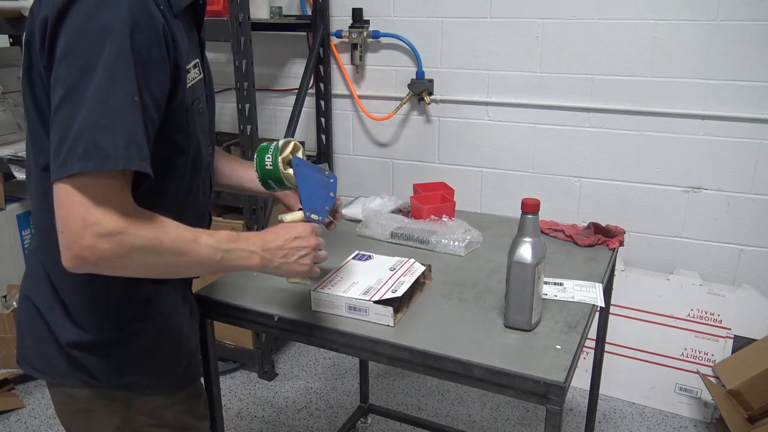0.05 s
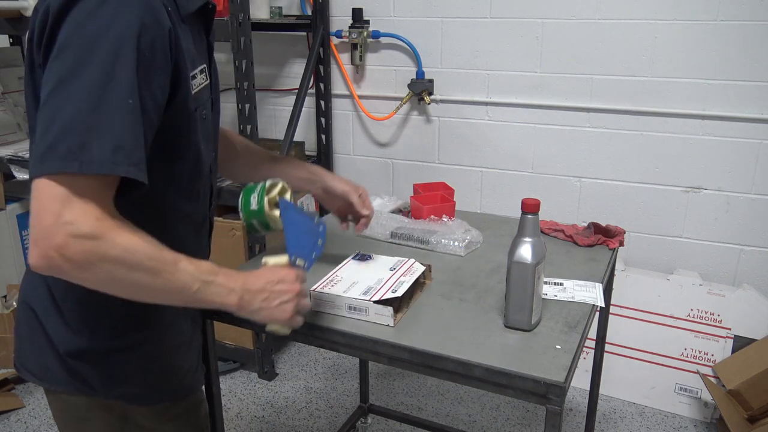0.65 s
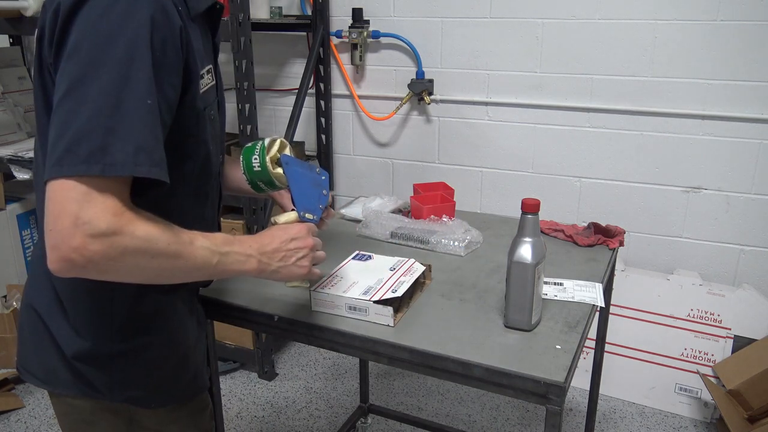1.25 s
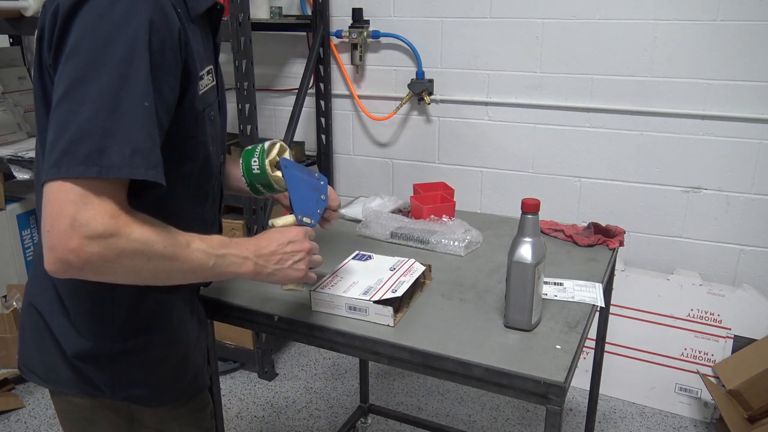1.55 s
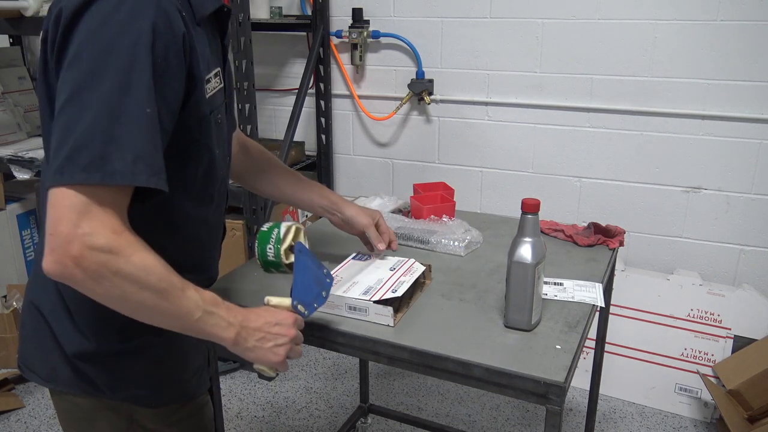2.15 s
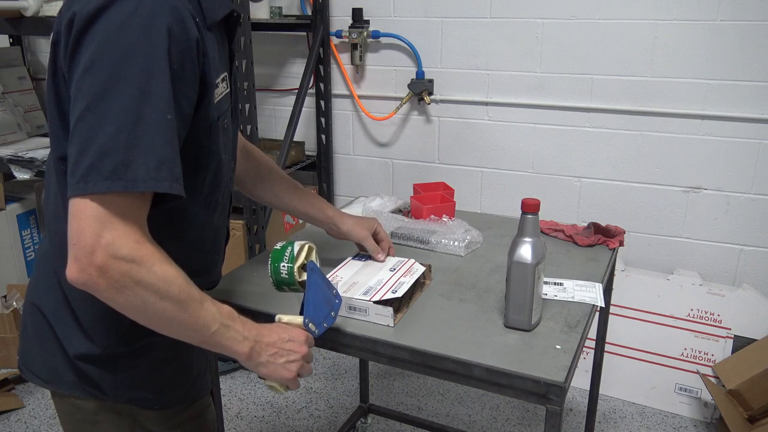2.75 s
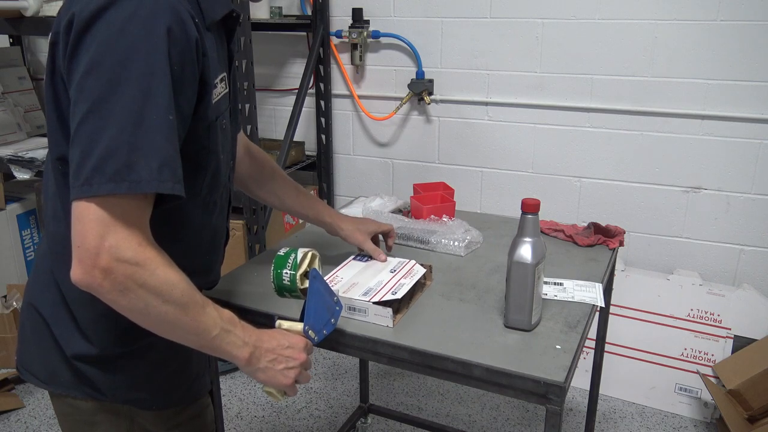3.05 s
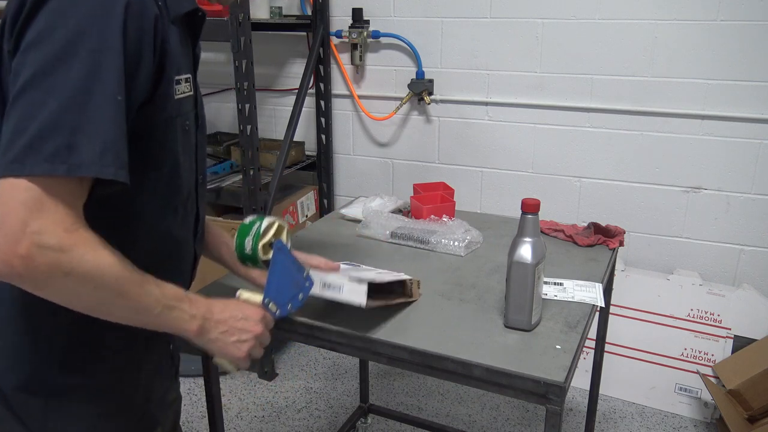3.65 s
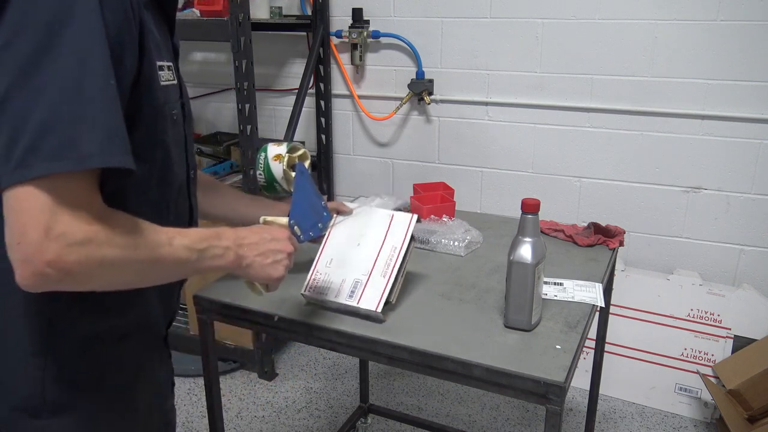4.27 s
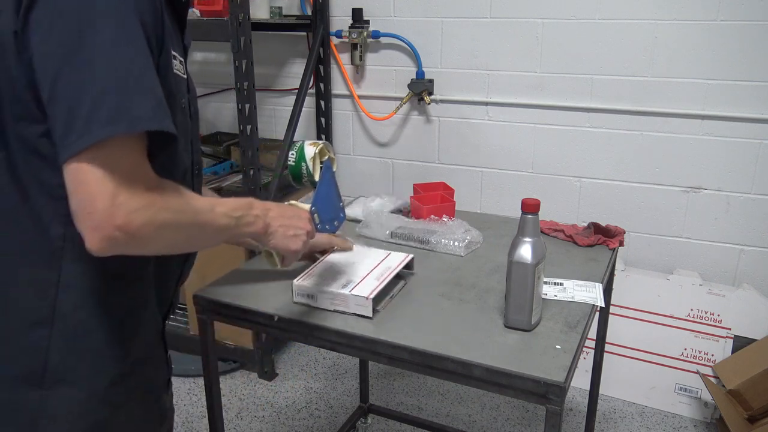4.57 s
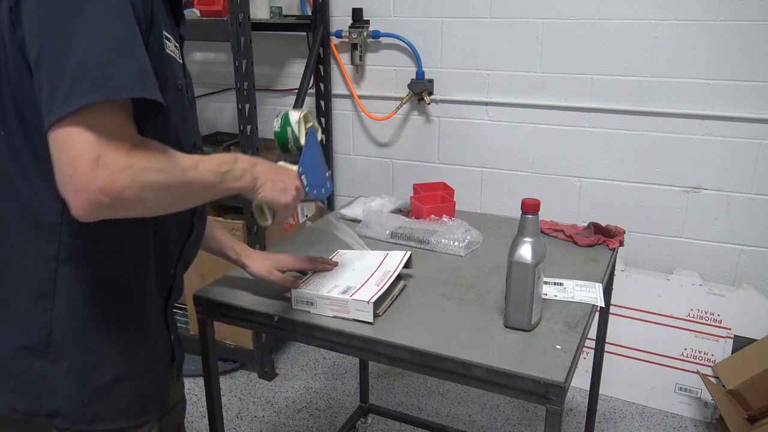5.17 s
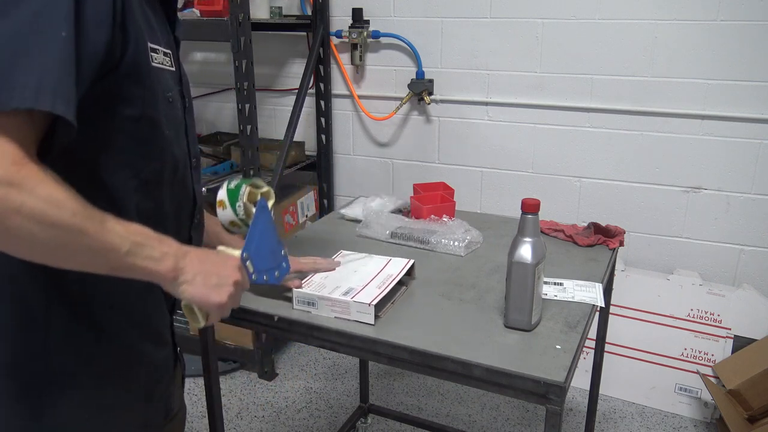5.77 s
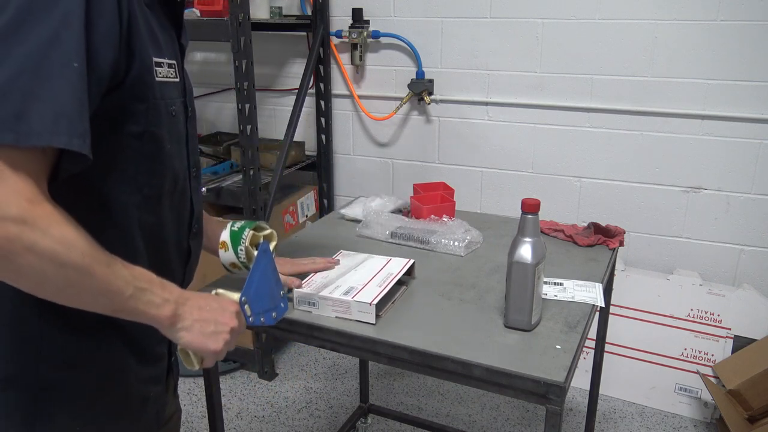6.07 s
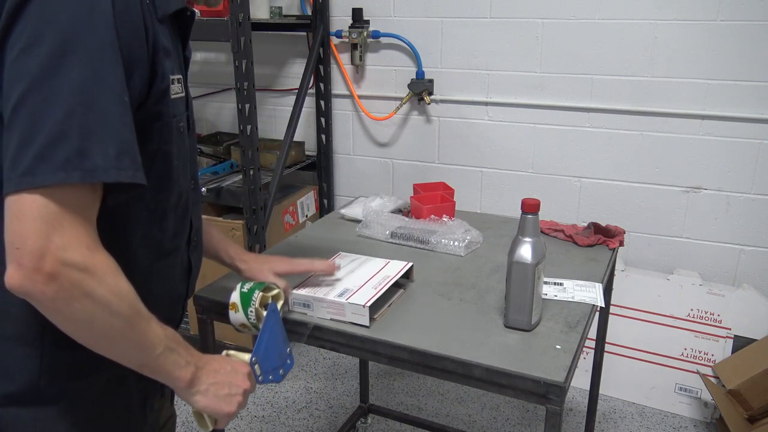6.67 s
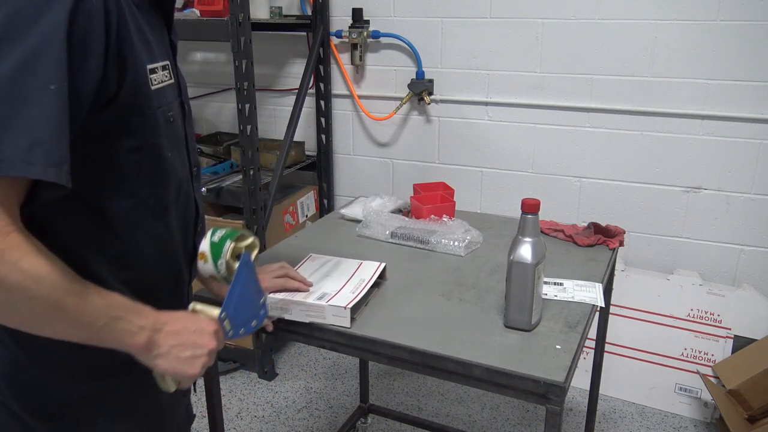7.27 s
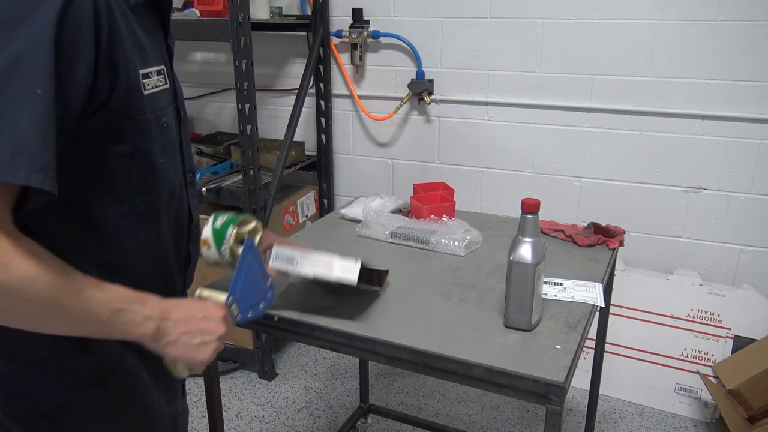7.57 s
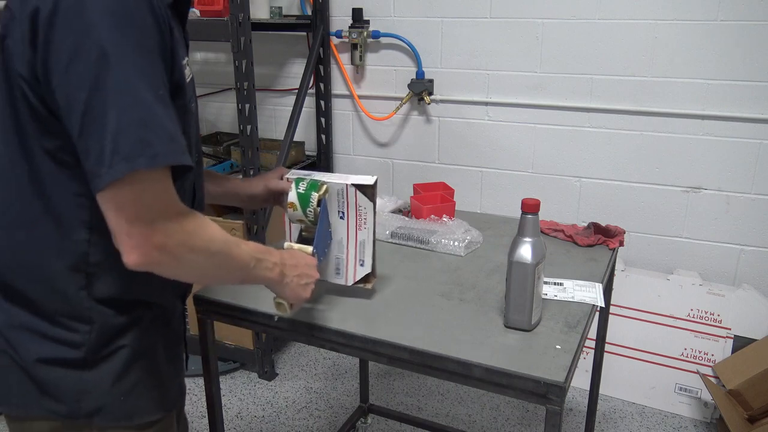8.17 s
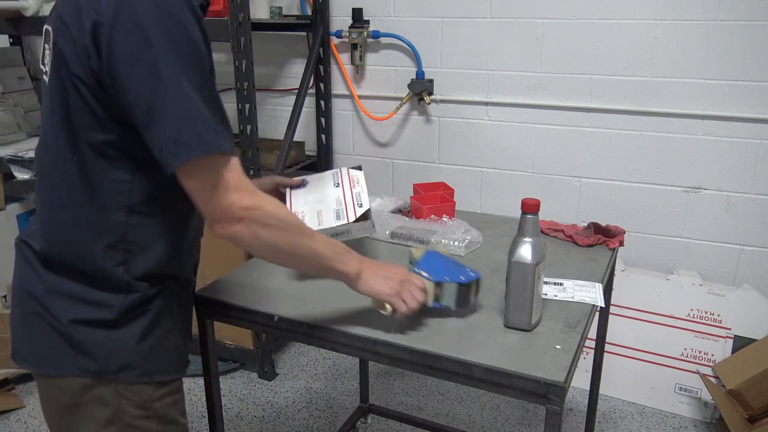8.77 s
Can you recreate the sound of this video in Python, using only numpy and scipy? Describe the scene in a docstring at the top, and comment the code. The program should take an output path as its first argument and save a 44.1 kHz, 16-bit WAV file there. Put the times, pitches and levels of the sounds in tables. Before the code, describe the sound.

A cardboard box is taped shut in an echoing workshop, with screeching tape, plastic snaps and knocks over a ventilation hum.

```python
"""A bare, echoing block-walled workshop with ventilation and motor hum; a small cardboard box is sealed
on a steel bench. Packing tape rips off a hand dispenser in fast stick-slip cracks, squeals, and drums
on the box it is stuck to. Between pulls plastic wrap snaps and crinkles, and the box slides and knocks.
At last the dispenser lands on the bench."""
import sys
import numpy as np
from scipy import signal
from scipy.fft import rfft, irfft, next_fast_len
from scipy.io import wavfile
from scipy.ndimage import uniform_filter1d

SR = 44100
rng = np.random.default_rng(int(sys.argv[2]) if len(sys.argv) > 2 else 0)


def file_out(sig):
    """Save sig as 16-bit WAV at sys.argv[1]."""
    # one column per channel
    cols = np.atleast_2d(sig).T
    # limit, then scale
    lim = np.clip(cols, -1, 1)
    pcm = np.round(lim * 32767).astype(np.int16)
    wavfile.write(sys.argv[1], SR, pcm)


N = 393372

# ventilation spectrum: f/Hz, density/dB
VENT_SPECTRUM = [(12, -59), (20, -39), (43, -18.5), (65, -13), (93, -14.5), (127, -14.5), (146, -9.5),
                 (285, -15.5), (310, -15.5), (527, -18), (3630, -32), (7310, -37.5), (8180, -34),
                 (14700, -48), (16000, -49)]
# motor and mains tones: f/Hz, level/dB
HUM_TONES = [(58, -66), (72, -63), (120, -61), (145, -65)]
# hall decay: f/Hz, t60/s
HALL_DECAY = [(100, 1.7), (250, 1.2), (550, 2.11), (1500, 2.72), (3200, 2.235), (4500, 2.22), (6400, 1.78),
              (9000, 1.154), (12000, 0.88), (16000, 0.56)]
# hall echo colour: f/Hz, level/dB
HALL_SPECTRUM = [(100, 3), (300, -9), (450, -1.5), (600, -2), (1000, -4), (2000, -4), (4000, -3.5),
                 (8000, -2.5), (16000, -5.5)]
# box resonances: f/Hz, width/Hz, level/dB
BOX_MODES = [(290, 48, -5.5), (400, 70, -1.5), (594.5, 67, 5), (722, 240, -6.5), (754, 160, -8.5),
             (1206, 120, -7), (1495, 260, -12), (2315, 1000, -11)]
# box sliding on the bench: t/s, length/s, level/dB, rubbing tone/Hz
BOX_SLIDES = [(3.418, .18, -43.5, 470), (3.714, .11, -45.5, 540), (3.892, .04, -42.5, 398),
              (4.671, .14, -40, 704), (6.796, 0.038, -38.5, 614), (7.165, 0.0406, -36, 1170),
              (7.228, .26, -43.5, 490), (7.622, .18, -49, 700), (8.222, 0.068, -48, 560)]
# box meeting bench and hand: t/s, peak/dB, brightness/Hz, thump/dB, thump/Hz, settling delay/s,
# settling re landing/dB
BOX_KNOCKS = [(.454, -33, 500, 17, 390, .015, -12), (2.987, -23.5, 806, -14, 497, .01, -21),
              (3.415, -30, 300, 3, 190, 0.027, -4), (4.099, -22, 703, 11.5, 380, 0.025, 1.5),
              (4.405, -26, 710, -6, 215, .012, -10), (4.665, -12.5, 1100, -1, 703, .042, -12),
              (5.304, -37, 502, 1, 240, .015, -14), (5.393, -16.5, 1204, -6.5, 330, .03, -7),
              (6.795, -25.5, 850, 7, 200, .013, -11), (7.002, -25, 1200, -21.5, 263, .008, -20.5),
              (7.158, -10, 2000, 8, 394, 0.019, -29), (8.147, -12, 750, 6, 400, 0.00383, -2.5),
              (8.219, -29.5, 1200, -4.5, 304, 0.025, -4), (8.474, -17.5, 690, 2.5, 230, .01, -6.5)]
# wrap and loose tape crinkling: t/s, length/s, level/dB, centre/Hz
WRAP_CRINKLES = [(0.296, 0.085, -60.5, 5500), (.44, .07, -41, 2960), (1.2, .065, -62, 3500),
                 (1.487, .068, -53.5, 6930), (2.992, .045, -45.5, 7000), (4.098, .06, -21, 6020),
                 (4.385, .045, -28.5, 7870), (6.998, .06, -51.5, 4950), (8.396, 0.026, -33.5, 7500)]
# film and dispenser snapping: t/s, peak/dB, centre/Hz, flutter/0-1
PLASTIC_SNAPS = [(.4438, -27, 2580, .3), (.469, -22, 9000, .08), (1.804, -35, 3610, .2),
                 (2.986, -5.5, 5590, 0.13), (3.675, -32.5, 4400, 0.3), (4.387, -3, 7500, 0.5),
                 (4.41, -13, 6000, .3), (4.917, -22, 5990, .1), (5.08, -28, 5930, .1),
                 (5.393, -5, 5540, .5), (7.415, -25.5, 4000, 0.1), (8.374, -16.5, 5780, .5),
                 (8.382, -21.5, 6070, .2), (8.484, -18.5, 2470, 0.4)]
# spectra of dispenser frame, drummed box, free film and peel line: f/Hz, density/dB
CLATTER_SPECTRUM = [(88, -42), (150, -5.5), (1170, -2.5), (2650, -11.5), (3220, -1.5), (4000, -16),
                    (7180, -5.5), (7770, -9), (16000, -28.5)]
DRUM_SPECTRUM = [(70, -36), (150, -12), (260, -2), (430, -1), (800, -2.5), (1200, -1.5), (2000, -16.5),
                 (4000, -48.5)]
RASP_SPECTRUM = [(400, -14), (900, -8), (1500, -3), (3200, -1), (4500, -1.5), (7000, -4.5), (16000, -31)]
HISS_SPECTRUM = [(2000, -30), (4000, -6), (5500, -5), (8200, -0.5), (10500, -2), (13000, -6.5),
                 (16000, -14.5)]
# taut film squealing: t/s, length/s, first f/Hz, last f/Hz, level/dB
FILM_SQUEALS = [(1.933, .04, 8390, 8060, -13.5), (1.971, .022, 6700, 7100, -19),
                (1.98, .055, 8370, 7710, -24.5), (3.997, .022, 8140, 9440, -16.5)]
# tape pulls: t/s, length/s, base level/dB, swell/s, drum offset/dB, rasp offset/dB, rasp centre/Hz,
# box ring share/0-1, drum low cut/Hz
TAPE_PULLS = [(1.832, .207, -16.5, 0.032, -7, 1.5, 2000, 0.17, 320),
              (3.935, 0.17, -15, 0.025, 2, 4.5, 1940, 0, 330),
              (5.402, .355, -16.5, 0.17, -1, -2.5, 2300, 0.5, 100),
              (8.392, .092, -37.5, 0.0039, 9.5, 4, 1250, 0.45, 271)]
# hand speed, one curve a pull (two jerks, a long draw, a tug): t/s, slip rate/Hz
SLIP_RATES = [
    [(1.83, 190), (1.9, 290), (1.965, 530), (1.992, 430), (2.04, 380)],
    [(3.935, 200), (3.985, 322), (4.01, 490), (4.045, 680), (4.072, 403), (4.1, 410)],
    [(5.4, 104), (5.76, 118)],
    [(8.39, 170), (8.48, 260)],
]


def amp(db):
    """Decibels to gain."""
    return 10 ** (np.asarray(db) / 20)


def unit(x):
    """Scale to rms 1."""
    return x / np.sqrt(np.mean(x ** 2) + 1e-20)


def clock(length_s):
    """Sample times in s."""
    return np.arange(max(int(length_s * SR), 8)) / SR


def along(points, hz):
    """Interpolate (f/Hz, value) points on a log axis."""
    f, values = np.transpose(points)
    return np.interp(np.log(hz + 1), np.log(f), values)


def add(track, start_s, x):
    """Mix x into the track."""
    part = track[round(start_s * SR):][:len(x)]
    part += x[:len(part)]


def filtered(x, response):
    """Apply a complex frequency response."""
    n = x.shape[-1]
    padded = next_fast_len(n + SR // 8)
    return irfft(rfft(x, padded) * response(np.fft.rfftfreq(padded, 1 / SR)), padded)[..., :n]


def coloured(x, spectrum):
    """Shape by a spectrum, at rms 1."""
    return unit(filtered(x, lambda f: amp(along(spectrum, f))))


def resonance(f, hz, width_hz):
    """Response of one damped resonance."""
    return 1j * f * width_hz / (hz * hz - f * f + 1j * f * width_hz)


def stroke(t, rise_s):
    """Quick swell fading to zero at the end of t, rms 1."""
    return unit((1 - np.exp(-t / rise_s)) * (1 - t / t[-1]))


def background(vent_db=-55, width_db=-19):
    """Motor hum, and ventilation that differs slightly between the ears."""
    t = np.arange(N) / SR
    hum = sum(amp(db) * np.sqrt(2) * np.sin(2 * np.pi * (hz * t + rng.random())) for hz, db in HUM_TONES)
    mid, side = amp(vent_db) * coloured(rng.standard_normal((2, N)), VENT_SPECTRUM)
    return hum + mid + amp(width_db) * np.array([side, -side])


def hall_tail(age_s):
    """Diffuse ring of the hall from age_s on; treble dies first."""
    hz, t, noise = signal.stft(rng.standard_normal(3 * SR), SR, nperseg=256)
    fade_db = along(HALL_SPECTRUM, hz)[:, None] - 60 * (t + age_s) / along(HALL_DECAY, hz)[:, None]
    return signal.istft(noise * amp(fade_db), SR, nperseg=256)[1]


def lingering_echo(db=-42, age_s=.8):
    """The hall still rings from an earlier rip of tape."""
    out = np.zeros(N)
    rip_hz_db = [(200, -10.5), (600, 3.5), (900, -4.5), (1500, 3), (3000, -3.5), (5000, -13.5),
                 (9000, -23)]
    ring = coloured(hall_tail(age_s), rip_hz_db)
    add(out, 0, amp(db) * ring / np.std(ring[:SR // 10]))
    return out


def workshop_echo(x, hall_db=-41.5, near_db=-36, near_t60_s=.2, build_s=.0068):
    """Bench and near wall answer at once, then the whole hall rings."""
    tail = amp(hall_db) * hall_tail(0)
    t = np.arange(len(tail)) / SR
    near = amp(near_db - 60 * t / near_t60_s) * rng.standard_normal(len(t))
    return signal.fftconvolve(x, (tail + near) * (1 - np.exp(-t / build_s)))[:N]


def cardboard(f, damping):
    """Response of the box's panels and cavity."""
    return sum((-1) ** k * amp(db) * resonance(f, hz, damping * width_hz)
               for k, (hz, width_hz, db) in enumerate(BOX_MODES))


def radiation(f, cut_hz):
    """A small panel radiates little below cut_hz."""
    return -f * f / (cut_hz * cut_hz - f * f + 1j * np.sqrt(2) * f * cut_hz)


def slides(tone_width_hz=90, tone_db=9, dull_hz=900):
    """Cardboard dragged over the bench rubs out a hollow tone over its own resonances."""
    out = np.zeros(N)
    for start_s, length_s, db, hz in BOX_SLIDES:
        t = clock(length_s)
        body = lambda f: cardboard(f, damping=3.6) + amp(tone_db) * resonance(f, hz, tone_width_hz)
        friction = lambda f: resonance(f, hz, 2.3 * hz) / (1 + 1j * f / dull_hz)
        rub = filtered(rng.standard_normal(len(t)), lambda f: body(f) * friction(f))
        add(out, start_s, amp(db) * unit(rub) * stroke(t, rise_s=.018))
    return out


def crinkles(folds_per_s=1300, fold_t60_s=.0022, rustle=.27, breadth=2.8, wrap_db=-12.5, wrap_hz=3150):
    """Tiny folds flip over on a bed of rustle; wrap inside the sliding box joins in."""
    out = np.zeros(N)
    shaken = [(start_s, 1.5 * length_s, db + wrap_db, wrap_hz) for start_s, length_s, db, _ in BOX_SLIDES]
    for start_s, length_s, db, hz in WRAP_CRINKLES + shaken:
        t = clock(length_s)
        folds = (rng.random(len(t)) < folds_per_s / SR) * rng.exponential(size=len(t))
        strength = rustle + signal.fftconvolve(folds, amp(-60 * t / fold_t60_s))[:len(t)]
        crackle = strength * rng.standard_normal(len(t))
        grains = filtered(crackle, lambda f: resonance(f, hz, breadth * hz) ** 2)
        add(out, start_s, amp(db) * unit(grains * stroke(t, rise_s=.012)))
    return out


def contacts(flat_bright_hz=650, flat_thump_db=9, flat_thump_hz=215):
    """Each knock is a landing, then a dull settling as the box falls flat."""
    for start_s, db, bright_hz, thump_db, thump_hz, settle_s, settle_db in BOX_KNOCKS:
        yield start_s, db, bright_hz, thump_db, thump_hz
        yield start_s + settle_s, db + settle_db, flat_bright_hz, flat_thump_db, flat_thump_hz


def knocks(chatter=.074, chatter_t60_s=.06, thump_width_hz=130, cut_hz=160):
    """An edge lands and chatters; a soft contact is dull, a flat one thumps."""
    out, t = np.zeros(N), clock(.15)
    for start_s, db, bright_hz, thump_db, thump_hz in contacts():
        force = (t == 0) + chatter * rng.standard_normal(len(t)) * amp(-60 * t / chatter_t60_s)
        body = lambda f: cardboard(f, damping=1.5) + amp(thump_db) * resonance(f, thump_hz, thump_width_hz)
        ring = filtered(force, lambda f: body(f) * radiation(f, cut_hz) / (1 + .5j * f / bright_hz) ** 2)
        add(out, start_s, amp(db) * ring / np.abs(ring).max())
    return out


def dispenser(start_s=8.91, db=-10, t60_s=.14):
    """The dispenser's frame clatters down on the steel top."""
    out, t = np.zeros(N), clock(.041)
    clatter = coloured(rng.standard_normal(len(t)), CLATTER_SPECTRUM)
    add(out, start_s, amp(db) * clatter * amp(-60 * t / t60_s))
    return out


def snaps(t60_s=.012, breadth=1.9, break_db=-13, break_hz=4500, break_flutter=.49):
    """Stiff plastic buckles with a crack and a brief flutter; each pull also breaks free with one."""
    out, t = np.zeros(N), clock(.04)
    breaks = [(start_s, break_db, break_hz, break_flutter) for start_s, *_ in TAPE_PULLS]
    for start_s, db, hz, flutter in PLASTIC_SNAPS + breaks:
        buckle = (t == 0) + flutter * rng.standard_normal(len(t)) * amp(-60 * t / t60_s)
        crack = filtered(buckle, lambda f: resonance(f, hz, breadth * hz) ** 2)
        add(out, start_s, amp(db) * crack / np.abs(crack).max())
    return out


def squeals(waver_hz=130):
    """At speed the slips lock into a short, unsteady whistle."""
    out = np.zeros(N)
    for start_s, length_s, first_hz, last_hz, db in FILM_SQUEALS:
        n = len(clock(length_s))
        waver = unit(uniform_filter1d(rng.standard_normal(n), size=60))
        pitch_hz = np.linspace(first_hz, last_hz, n) + waver_hz * waver
        whistle = np.sin(2 * np.pi * np.cumsum(pitch_hz) / SR)
        add(out, start_s, amp(db) * unit(signal.windows.tukey(n, .5) * whistle))
    return out


def effort(t, length_s, swell_s, swell_db=12, ease_db=3.5, ease_share=.19):
    """Effort of a pull in dB: swells, holds, eases over its last share."""
    easing = np.clip((t / length_s - 1) / ease_share + 1, 0, 1)
    return -swell_db * np.maximum(1 - t / swell_s, 0) - ease_db * easing


def peeling(rate_curve, t, crossover_hz=427, steepness=6.2):
    """Slip rate in Hz, and how far (0-1) rattling has given way to smooth peeling."""
    slip_hz = np.interp(t, *np.transpose(rate_curve))
    return slip_hz, 1 / (1 + (crossover_hz / slip_hz) ** steepness)


def stick_slip(slip_hz, effort_db, merge_hz=310, jitter=.1, scatter_db=1.5, decay_cycles=.2):
    """Glue holds, cracks free and holds again; the cracks merge with speed and effort."""
    merged = np.clip(amp(.43 * effort_db) * slip_hz / merge_hz, 0, 1)
    unrest = unit(uniform_filter1d(rng.standard_normal(len(slip_hz)), size=200))
    cycles = np.cumsum(slip_hz * np.exp(jitter * unrest)) / SR
    sizes = amp(scatter_db * rng.standard_normal(len(slip_hz)))[cycles.astype(int)]
    phase = cycles % 1
    cracks = unit(sizes * phase * np.exp(-phase / decay_cycles))
    return np.sqrt(merged + (1 - merged) * cracks ** 2)


def tape(film_trim_db=-1, rasp_width_hz=1950, grit=.22, run_on_s=.0071):
    """Each slip hisses at the peel line, rattles the free film and tugs at the box."""
    out = np.zeros(N)
    for pull, rate_curve in zip(TAPE_PULLS, SLIP_RATES):
        start_s, length_s, db, swell_s, drum_db, rasp_db, rasp_hz, ring_share, cut_hz = pull
        t = clock(length_s + .04)
        slip_hz, smooth = peeling(rate_curve, start_s + t)
        effort_db = effort(t, length_s, swell_s)
        # smooth peeling trades drum and rasp for hiss
        drum_gain = amp(db + drum_db + effort_db - 27 * smooth)
        rasp_gain = amp(db + rasp_db + .7 * effort_db - 14 * smooth)
        hiss_gain = amp(db + .66 * effort_db + 4.5 * smooth)
        threads = stick_slip(slip_hz, effort_db) * rng.standard_normal((4, len(t)))
        threads *= np.exp(grit * rng.standard_normal(len(t)))  # glue threads break in uneven sizes
        ring = unit(filtered(threads[0], lambda f: cardboard(f, damping=.49)))  # taut panels ring longer
        panels = ring_share * ring + (1 - ring_share) * coloured(threads[1], DRUM_SPECTRUM)
        drum = drum_gain * unit(filtered(panels, lambda f: radiation(f, cut_hz)))
        strip = filtered(threads[2], lambda f: resonance(f, rasp_hz, rasp_width_hz))
        rasp = rasp_gain * coloured(strip, RASP_SPECTRUM)
        hiss = hiss_gain * coloured(threads[3], HISS_SPECTRUM)
        run_on = np.exp(-np.maximum(t - length_s, 0) / run_on_s)  # the roll coasts after the hand stops
        add(out, start_s, (drum + amp(film_trim_db) * (rasp + hiss)) * run_on)
    return out


def scene(spread_db=-16, lean_db=-25, side_cut_hz=850):
    """The work is straight ahead; only its lows have width, leaning left."""
    direct = tape() + squeals() + knocks() + slides() + snaps() + crinkles() + dispenser()
    room = workshop_echo(direct) + lingering_echo()
    mid = direct + room
    late_room = np.pad(room, (SR // 50, 0))[:N]
    side = amp(spread_db) * late_room + amp(lean_db) * mid
    side = filtered(side, lambda f: 1 / (1 + (f / side_cut_hz) ** 4))
    return mid + np.array([side, -side]) + background()


def record(dry, top_hz=15950):
    """Round off the highest peaks; cut everything above top_hz."""
    rounded = dry / (1 + np.abs(dry) ** 6) ** (1 / 6)
    return filtered(rounded, lambda f: f < top_hz)


dry = scene()
out = record(dry)
file_out(out)
```